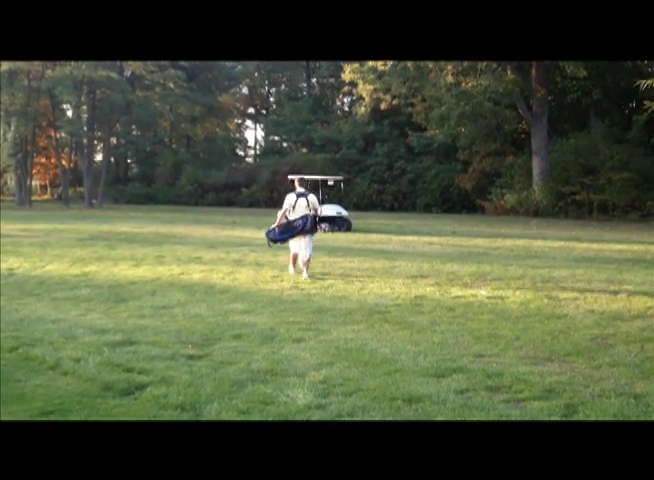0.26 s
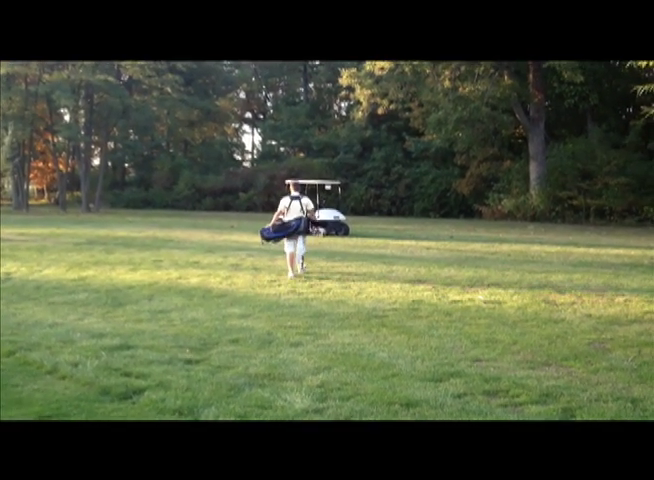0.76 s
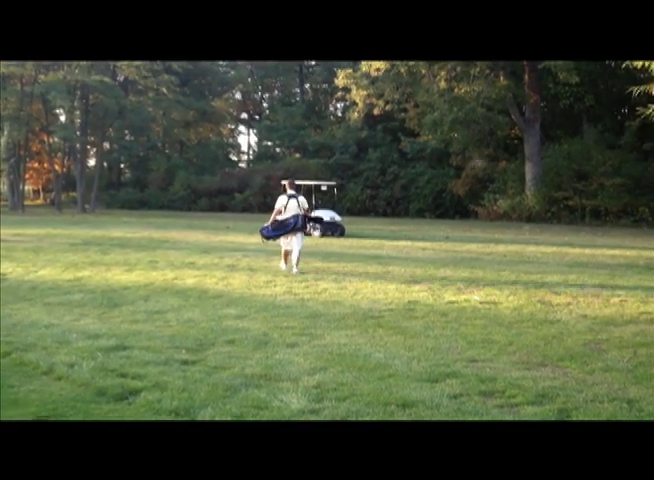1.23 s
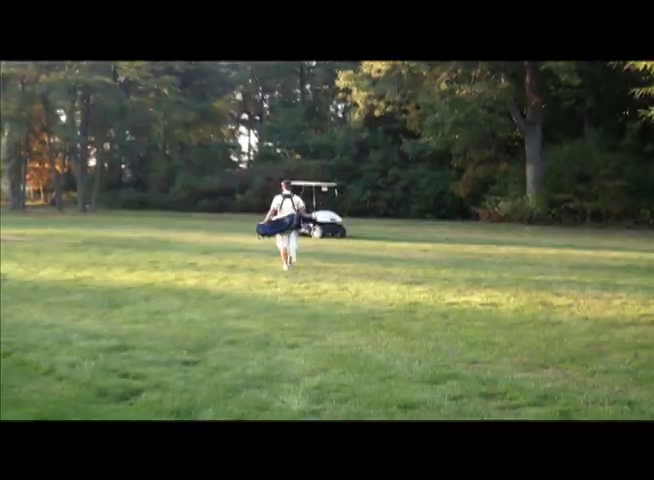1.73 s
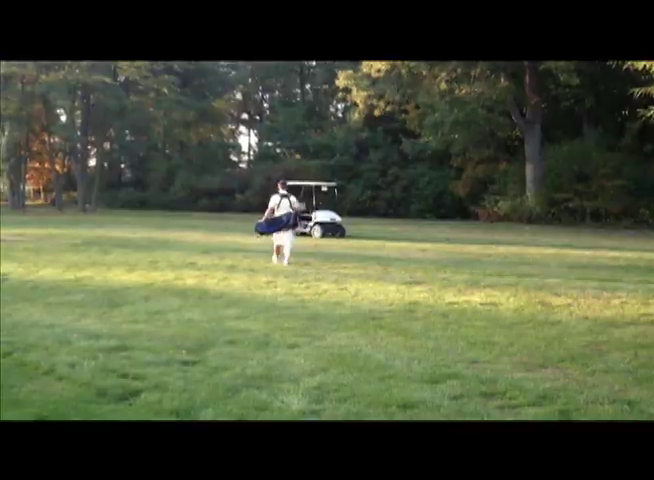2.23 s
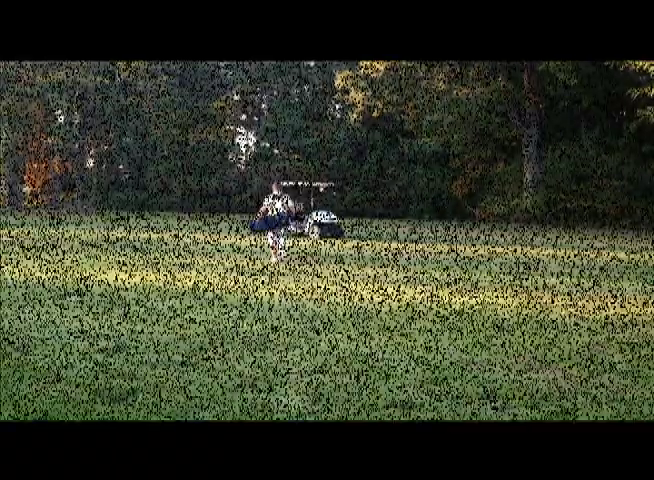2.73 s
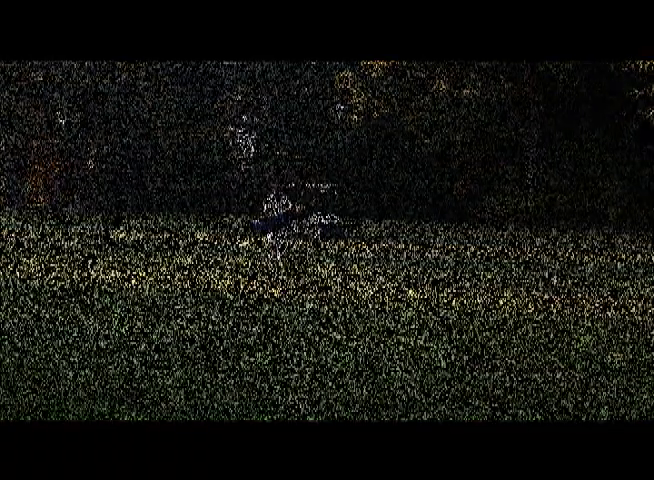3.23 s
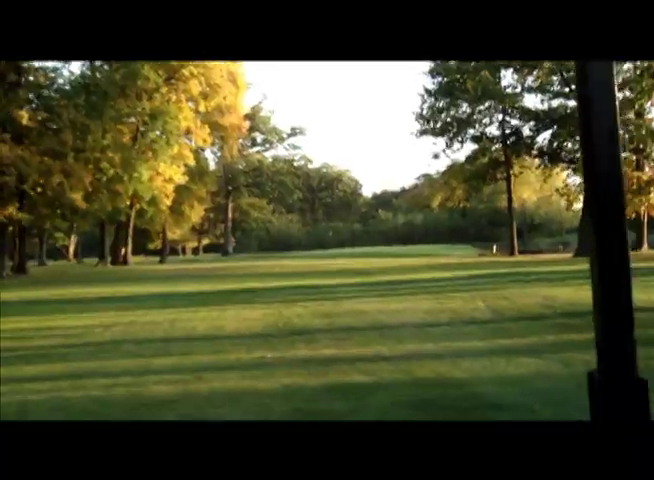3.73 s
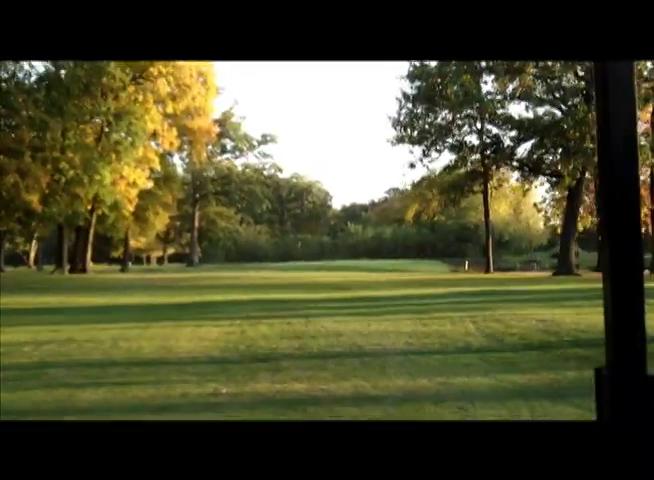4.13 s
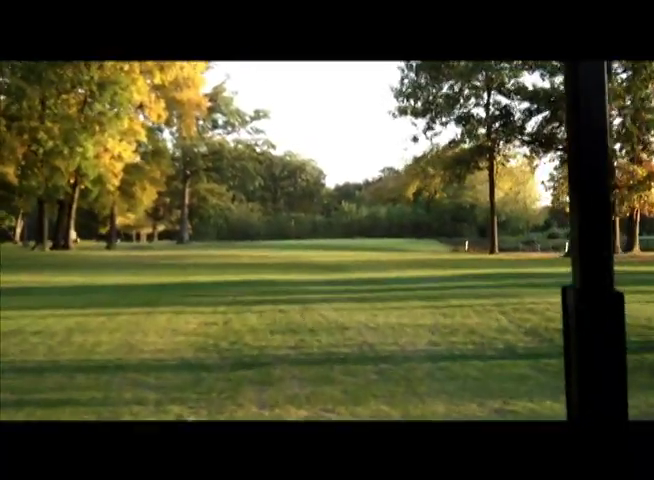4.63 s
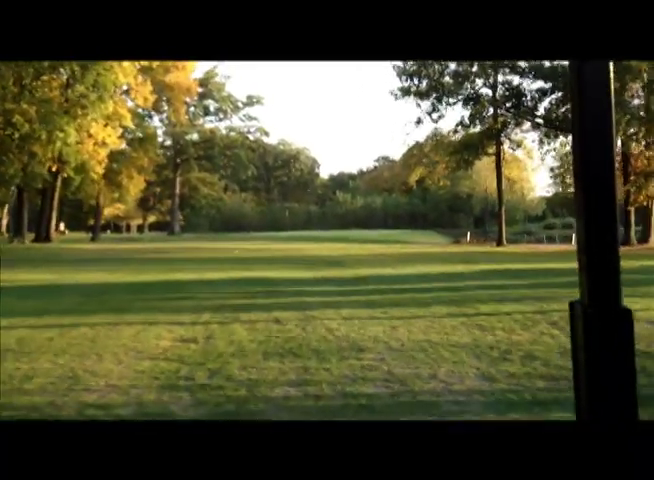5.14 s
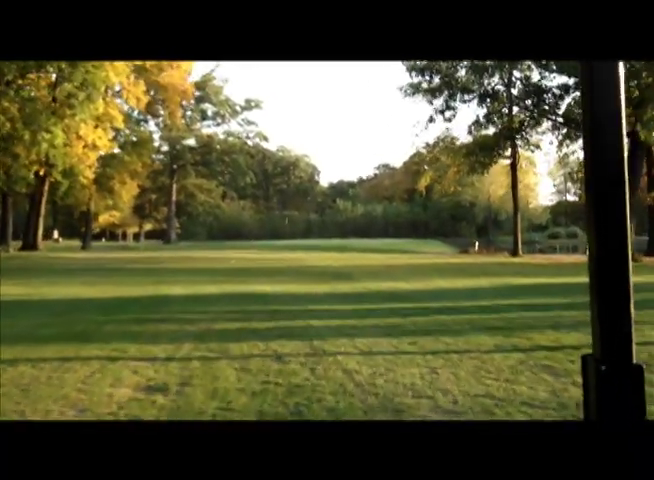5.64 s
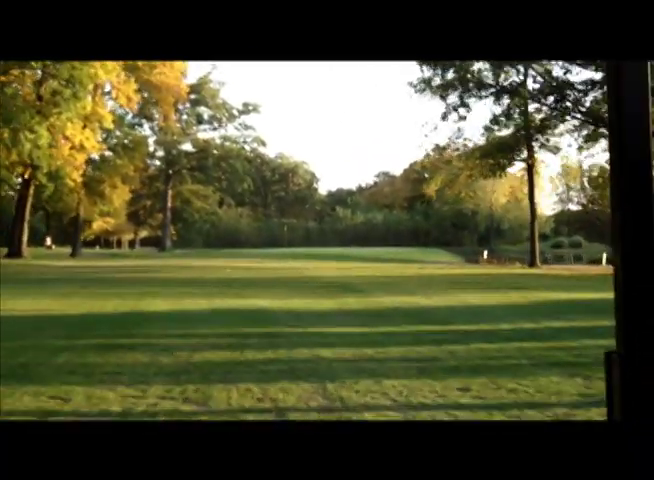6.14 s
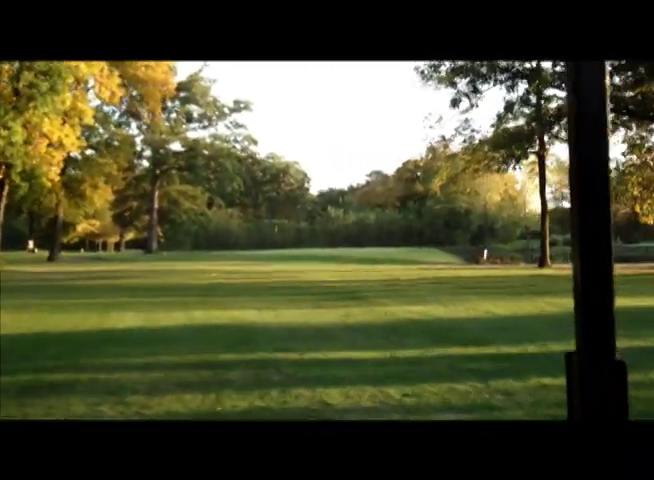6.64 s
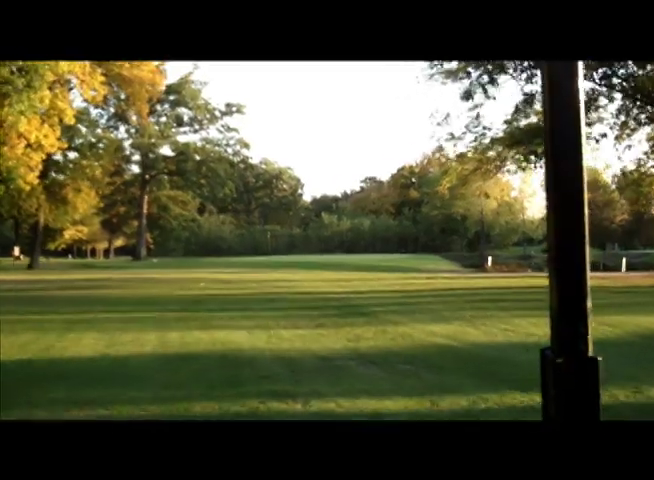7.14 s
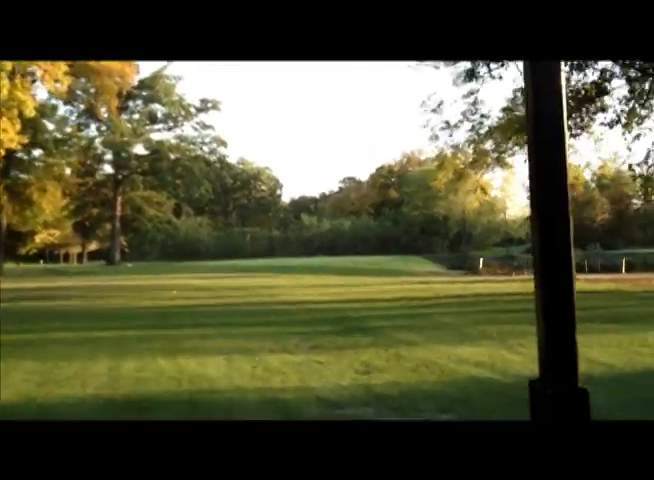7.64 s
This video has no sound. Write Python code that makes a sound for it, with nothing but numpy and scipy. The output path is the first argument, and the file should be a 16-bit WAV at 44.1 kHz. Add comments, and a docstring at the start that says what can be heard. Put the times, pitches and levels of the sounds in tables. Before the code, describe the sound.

Outdoors on a quiet lawn, a walker's golf bag clicks about twice a second, each step a tight cluster of short metallic ticks with a soft padded thump, and lighter touches between. Faint crickets, leaves and a distant hum lie behind. At three and a half seconds it cuts hard to an onboard cart ride: low rumble, irregular jolts, rattling panels, steel clinks and hollow post knocks, close to the microphone.

```python
"""On a lawn at dusk, a golfer walks with a bag: club heads click at each step and as the bag swings,
crickets trill and a far machine hums. Then comes a cart ride over bumpy grass.
The frame rumbles, jolts shake panels and bags, a loose steel part clinks and the roof post knocks.
Blows are short fading tones with noisy edges; rumble, rattle and leaves are shaped noise."""
import sys
import numpy as np
from scipy import signal
from scipy.fft import rfft, irfft, next_fast_len
from scipy.io import wavfile
from scipy.ndimage import map_coordinates

SR = 44100
rng = np.random.default_rng(int(sys.argv[2]) if len(sys.argv) > 2 else 0)


def to_wav(s):
    """Save 16-bit WAV."""
    ch = np.atleast_2d(s).T  # columns
    pcm = np.round(np.clip(ch, -1, 1) * 32767)  # PCM
    wavfile.write(sys.argv[1], SR, pcm.astype(np.int16))


N = 347508
T = np.arange(N) / SR  # the time of every sample, in seconds

RIDE_S = 3.536  # the walk gives way to the ride
TOP_HZ = 15800  # nothing above this is kept

# Below, "t60/s" is the time a tone takes to fall by 60 dB; levels are starting points for each blow.
# Lawn air, far traffic and leaves: f/Hz, relative level/dB
LAWN_SPECTRUM = [(15, -45), (25, -8), (114, 1.5), (427, -1), (720, 3), (988, 3.5), (1890, -9),
                 (2610, -11.5), (4490, -12), (7710, -23), (13200, -24.5), (16000, -24)]
# Hum of the far machine: t/s, level/dB
HUM_LEVELS = [(0, -60), (2, -59.5), (2.4, -72), (3.5, -68)]
# Soft low bumps: t/s, relative level/dB, f/Hz
THUD_EVENTS = [(1.506, -31, 177), (2.635, -26.5, 215), (2.759, -33, 133), (2.964, -34, 110)]

# Tone of a club head: f/Hz, relative level/dB, t60/s
HEAD_MODES = [(3350, 6, 0.0084)]
# Tones of the shafts in the bag: f/Hz, relative level/dB, t60/s
SHAFT_MODES = [(1113, 2, 0.055), (1595, 7, 0.031), (2130, -3, 0.0075), (2710, 12.5, 0.009),
               (4520, 12, 0.0084), (6160, 5, 0.014)]
# Steps, when the bag lands on the hip: t/s, level/dB, second contact after/s, last bounce after/s,
# head ring of the second contact against the step/dB
STEP_EVENTS = [(0.41, -30.5, 0.012, 0.029, 3), (0.9291, -32, 0.0079, 0.029, 1),
               (1.4321, -29.5, 0.0071, .0298, 1.5), (1.9494, -30.5, 0.014, 0.038, 8),
               (2.471, -29.5, 0.0067, 0.027, 8), (2.9476, -32, 0.013, 0.027, 1),
               (3.4687, -30, 0.0085, 0.036, 11.5)]
# Single touches as the bag swings: t/s, head ring level/dB, shaft knock level/dB
TOUCH_EVENTS = [(0.0686, -41, -51.5), (0.0914, -29, -53), (0.1113, -31, -39.5), (0.232, -53, -55),
                (0.3015, -30, -46), (0.595, -44, -57.5), (0.807, -55, -54), (0.861, -38, -49.5),
                (1.092, -26, -54), (1.1196, -42, -54), (1.3273, -30, -46), (1.6676, -36.5, -45),
                (1.787, -55, -55), (1.858, -24.5, -47), (2.107, -25, -55), (2.1388, -38, -50),
                (2.3558, -27, -44), (2.391, -40, -64), (2.404, -35, -57), (2.511, -35, -53),
                (2.6165, -29, -57), (2.6438, -32, -44.5), (2.866, -24, -47), (3.0816, -26.5, -49),
                (3.125, -27, -44.5), (3.3581, -26.5, -49.5), (3.3833, -33.5, -57)]
FIRST_DB, BOUNCE_DB = (6.5, -8), (-5, -22)  # (head ring, shaft knock) against the step
SECOND_SHAFT_DB = -13  # shaft knock of the second contact against the step
EDGE_DB = 6  # noisy edge against the shaft knock

# Strength of the ride: t/s, rumble level/dB, relative rattle level/dB
RIDE_LEVELS = [(3.54, -31.5, -40), (3.75, -33.5, -39), (3.9, -36, -43.5), (4.55, -36, -41), (5, -33, -36.5),
               (5.45, -30.5, -38.5), (5.65, -27.5, -30), (6.1, -30.5, -30.5), (6.8, -33, -34),
               (7.1, -29, -32.5), (7.5, -30.5, -37), (7.88, -28.5, -33.5)]
# Rumble of the frame: f/Hz, relative level/dB
RUMBLE_SPECTRUM = [(11, -56), (24, 2), (48, -2), (113, 0), (500, -12), (650, -16), (1100, -120)]
# Rattle of panels and loose bits: f/Hz, relative level/dB
RATTLE_SPECTRUM = [(180, -19), (300, -1.5), (647, 3), (964, -5.5), (1190, 4.5), (4550, -23), (9000, -45),
                   (13000, -120)]
# Jolts: t/s, relative level/dB, hold/s, treble against the frame/dB
JOLT_EVENTS = [(3.568, -34, 0.012, -2.5), (3.628, -45, 0.011, 7), (3.66, -41.5, 0.017, 0),
               (3.757, -36.5, 0.0058, -4), (3.942, -43, 0.025, -2.5), (4.034, -36, 0.0062, -5),
               (4.237, -30.5, 0.0094, -16), (4.335, -34.5, 0.027, -10), (4.389, -30.5, 0.019, -13),
               (4.435, -36, 0.015, -7), (4.909, -31, 0.014, -28), (4.965, -25.5, 0.0099, -9.5),
               (5.07, -32.5, 0.0036, -2.5), (5.18, -32, 0.0087, -3), (5.231, -42, 0.024, 7.5),
               (5.3, -29.5, 0.045, -12), (5.373, -30.5, 0.012, -11), (5.551, -31, 0.014, -2.5),
               (5.585, -22.5, 0.021, -28), (5.632, -24.5, 0.026, -8.5), (5.693, -30, 0.0097, -4),
               (5.733, -41, 0.0072, 2), (5.816, -21, 0.025, -8), (5.917, -24, 0.031, -9.5),
               (6.052, -26.5, 0.006, -14), (6.082, -34, 0.0042, 2), (6.153, -26.5, 0.013, -8),
               (6.24, -18.5, 0.011, -26), (6.308, -25, 0.03, -11), (6.428, -36.5, 0.024, -1.5),
               (6.519, -29, 0.049, -8), (6.594, -32, 0.0054, -21), (6.629, -29.5, 0.0082, -5.5),
               (6.669, -30, 0.011, -4), (6.819, -31, 0.0075, 2.5), (6.888, -29.5, 0.023, -1.5),
               (6.93, -24.5, 0.0046, -14), (6.986, -29, 0.018, -3.5), (7.109, -38, 0.022, 4.5),
               (7.169, -26, 0.0095, -6), (7.202, -24.5, 0.0059, -8), (7.292, -41.5, 0.018, 7),
               (7.403, -25.5, 0.02, -9.5), (7.561, -39.5, 0.017, 0), (7.619, -21.5, 0.0094, -7.5),
               (7.667, -24.5, 0.012, -6), (7.726, -24.5, 0.0088, -11.5), (7.782, -28.5, 0.0036, -8),
               (7.833, -40, 0.014, 7.5)]
# Resonance of the floor panel: f/Hz, width/Hz, relative level/dB
PANEL_PEAKS = [(638, 60, 0)]
# Resonances of the frame: f/Hz, width/Hz, relative level/dB
FRAME_PEAKS = [(1190, 25, 5), (1463.5, 43.5, 7.5), (1990, 560, -5.5)]
# Resonances of the bags: f/Hz, width/Hz, relative level/dB
BAG_PEAKS = [(3200, 4100, -16), (5500, 6000, -21.5)]
# Dry snaps of club on club: t/s, relative level/dB
SNAP_EVENTS = [(4.4346, -39), (4.484, -42), (5.0744, -28.5), (5.1303, -34), (5.1482, -32), (5.553, -34),
               (5.923, -34), (6.63, -34)]
JOLT_RISE_S, JOLT_T60_S = 0.00094, 0.083
PANEL_DB, PANEL_FADES_DB_PER_S = 3.5, 3  # the panel against the frame; it answers less as the ride goes on

# Hits of the loose steel part: t/s, relative level/dB
CLINK_EVENTS = [(3.816, -50.5), (4.295, -50), (4.548, -50), (5.5392, -45), (5.8213, -40), (5.9306, -39.5),
                (5.969, -47), (6.1772, -48.5), (6.3782, -37.5), (6.536, -43.5), (6.5889, -39.5),
                (6.724, -50.5), (6.817, -35.5), (6.907, -46), (6.967, -44), (7.0455, -41), (7.204, -35.5),
                (7.683, -38.5), (7.786, -37)]
# Tones of the steel part: f/Hz, relative level/dB, t60/s
STEEL_MODES = [(1190, 11, .1), (2414, 0, .06), (4580, -1, .07), (5005, -1, .06), (6778, -1, .04),
               (7490, -12, .035), (9255, -14, .04)]
# Taps on a club shaft: t/s, relative level/dB, favoured f/Hz
PING_EVENTS = [(3.763, -30, 2940), (4.522, -36, 2950), (4.697, -33.5, 3060), (6.129, -35, 2680),
               (6.999, -26, 2800), (7.458, -32.5, 3080), (7.608, -28, 2640)]
# Tones of one tapped shaft: f/Hz, relative level/dB, t60/s
ROD_MODES = [(2360, 4.5, 0.11), (2720, 2, 0.072), (3163, 1.5, 0.069), (3660, -3, 0.034)]
CHATTER_COUNT, CHATTER_DB = 18, -25  # extra steel hits; the weakest against the rattle level
TAP_COUNT, TAP_DB = 70, -6.5  # small shaft taps; the strongest against the rattle level
FAVOUR_DB_PER_OCTAVE = 39  # where the shaft is tapped favours one tone over its neighbours

# Knocks on the roof post: t/s, relative level/dB, f/Hz, t60/s
KNOCK_EVENTS = [(3.728, -1, 515, 0.016), (3.7358, -7, 546, 0.026), (4.0084, -1.5, 542, 0.0098),
                (4.459, -12.5, 523, 0.013), (6.5909, -12, 900, 0.006)]
# One rub of a joint: t/s, length/s, f/Hz, fall/Hz, level/dB
SQUEAK_EVENT = (3.624, .009, 2250, 300, -36)


def amp(db):
    """Turn dB into a gain."""
    return 10 ** (np.asarray(db) / 20)


def unit(x):
    """Scale to an average strength (rms) of 1."""
    return x / np.sqrt(np.mean(x ** 2) + 1e-20)


def curves(rows):
    """Draw straight lines between table rows: one curve for each column after the time."""
    s, *columns = np.transpose(rows)
    return [np.interp(T, s, column) for column in columns]


def wobble(rate):
    """A smooth random curve with rate knots a second."""
    knots = rng.standard_normal(int(N * rate / SR) + 4)
    return map_coordinates(knots, [T * rate])


def noise():
    """White noise: all pitches equally strong."""
    return rng.standard_normal(N)


def filtered(x, response):
    """Change the strength and phase of each pitch by a response of frequency."""
    m = next_fast_len(N + SR // 8, True)
    spectrum = rfft(x, m) * response(np.fft.rfftfreq(m, 1 / SR))
    return irfft(spectrum, m)[..., :N]


def coloured(points, x):
    """Shape x by (Hz, dB) points on a log pitch scale, rms 1."""
    f, db = np.transpose(points)

    def response(hz):
        return amp(np.interp(np.log(hz + 1), np.log(f + 1), db))

    return unit(filtered(x, response))


def resonant(peaks, x, order=1):
    """Pass x through resonances, order times; each pass would bring white noise to rms 1."""
    def response(f):
        total = 0
        for k, (centre, width, db) in enumerate(peaks):
            peak = 1j * f * width / (centre * centre - f * f + 1j * f * width)
            total = total + (-1) ** k * amp(db) * peak  # alternate signs
        return total

    gain = np.sqrt(np.mean(np.abs(response(np.linspace(0, SR / 2, 4096))) ** 2))
    return filtered(x, lambda f: (response(f) / gain) ** order)


def add(track, s, sound):
    """Mix a sound into a track at time s."""
    part = track[round(s * SR):][:len(sound)]
    part += sound[:len(part)]


def ring(modes, scatter_db, detune, attack):
    """One blow: fading tones of slightly random strength and pitch; a soft contact starts slowly."""
    t = T[:SR // 12]
    tones = 0
    for hz, db, t60 in modes:
        fade = amp(db + rng.normal(0, scatter_db) - 60 * t / t60)
        pitch = hz * (1 + rng.normal(0, detune))
        tones = tones + fade * np.sin(2 * np.pi * pitch * t)
    return (1 - np.exp(-t / attack)) * tones


def puff(t60):
    """The noisy edge of a blow: noise that fades by 60 dB in t60 seconds."""
    return rng.standard_normal(SR // 12) * amp(-60 * T[:SR // 12] / t60)


def grit(spiky_db):
    """Noise of tiny contacts of uneven size, rms 1."""
    return unit(noise() * amp(spiky_db * wobble(900)))


def bumps(rate, fade_s):
    """Strength of random small shocks: each starts at once and fades, over a steady floor, rms 1."""
    shocks = (rng.random(N) < rate / SR) * rng.lognormal(0, .3, N)
    fading = signal.lfilter([1], [1, -np.exp(-1 / (fade_s * SR))], shocks)
    return unit(fading + 0.4)


def clacks(count, hz, width_hz):
    """About count dry ticks a second, each a puff of noise in one broad resonance, rms 1."""
    hits = (rng.random(N) < count / SR) * amp(rng.uniform(-12, 0, N))
    fading = signal.lfilter([1], [1, -np.exp(-1 / (.0012 * SR))], hits)
    return unit(resonant([(hz, width_hz, 0)], fading * noise(), order=2))


def clatter(level, count, hz, spread, cycles):
    """About count small rings a second of the ride, up to spread octaves from hz, following level."""
    ride = N / SR - RIDE_S
    u, v, w = rng.random((int(count * ride), 3)).T
    at = ((RIDE_S + u * ride) * SR).astype(int)
    t = T[:SR // 60]
    pitches = hz * 2 ** (spread * (2 * v - 1))
    phase = pitches[:, None] * t  # counted in cycles
    strength = (level[at] * amp(-18 * w))[:, None]
    envelope = amp(-60 * phase / cycles) * (1 - np.exp(-phase))
    rings = strength * envelope * np.sin(2 * np.pi * phase)
    places = at[:, None] + np.arange(len(t))
    return np.bincount(places.ravel(), rings.ravel(), N + SR)[:N]


def trill(hz, fall_hz, rate, first_s, jitter):
    """A cricket: rate pulses a second, each sliding down in pitch."""
    turn = (rate * (T - first_s) + jitter * wobble(6.5) + .5) % 1 - .5  # place within the pulse
    pulses = np.exp(-(turn / .3) ** 4) * amp(wobble(rate))
    return pulses * np.sin(2 * np.pi * np.cumsum(hz - fall_hz * turn) / SR)


def lawn():
    """Far traffic and leaves as noise, a wavering hum, crickets and a faint fast treble pulse."""
    air = amp(-53) * coloured(LAWN_SPECTRUM, noise())
    hum_level = amp(curves(HUM_LEVELS)[0] + 0.83 * wobble(10.4))
    hum = hum_level * np.sin(2 * np.pi * np.cumsum(118 + 2.0 * wobble(3.73)) / SR)
    # the first cricket grows 1 dB weaker each second
    first_cricket = amp(-57.5 - T + wobble(3)) * trill(2210, 350, 37.44, .006, .015)
    second_cricket = amp(-63.5) * trill(2660, 250, 38.6, .01, .1)
    chorus_spectrum = [(3500, -45), (4250, 5), (4700, 6), (5600, -35.0)]
    far_chorus = amp(-68.5) * coloured(chorus_spectrum, noise())
    beat = np.cos(np.pi * 29.97 * (T - .0068)) ** 12  # 29.97 pulses a second
    pulse = amp(-76) * beat * resonant([(13300, 1500, 0)], noise(), order=2)
    return air + hum + first_cricket + second_cricket + far_chorus + pulse


def thuds():
    """Each soft bump is a low tone that dies within a few cycles, with a brief tone above it."""
    out = np.zeros(N)
    for s, db, hz in THUD_EVENTS:
        modes = [(hz, -3, 4 / hz), (hz * 5, 4, .004)]
        add(out, s, amp(db) * ring(modes, 1.6, .01, 0.0003))
    return out


def squeak():
    """A joint rubs once: a brief tone whose pitch sags, with two overtones."""
    s, length, hz, fall_hz, db = SQUEAK_EVENT
    u = np.clip((T - s) / length, 0, 1)
    phase = 2 * np.pi * np.cumsum(hz - fall_hz * u) / SR
    tones = sum(amp(-9 * k) * np.sin((k + 1) * phase) for k in range(3))
    return amp(db) * np.sin(np.pi * u) * tones


def cart():
    """The frame rumbles as low noise; small shocks keep panels and loose bits rattling and clacking."""
    rumble_db, rattle_db = curves(RIDE_LEVELS)
    uneven = coloured(RUMBLE_SPECTRUM, noise()) * amp(1.75 * wobble(18))
    rumble = amp(rumble_db) * unit(uneven)
    shake = grit(0.64) * bumps(60, 0.015)
    rattle = coloured(RATTLE_SPECTRUM, shake)
    rattle += amp(-20.0) * unit(resonant(FRAME_PEAKS[:2], shake))
    rattle += amp(-13.0) * unit(resonant(PANEL_PEAKS, shake))
    loose_bits = clatter(amp(rattle_db + 4.5), count=260, hz=1714, spread=1.42, cycles=32)
    return rumble + amp(rattle_db - 1) * unit(rattle) + loose_bits


def knocks():
    """Hollow plastic blows on the post: a few low cycles, a dull noisy edge and a thin crack."""
    out, edge = np.zeros(N), np.zeros(N)
    for s, db, hz, t60 in KNOCK_EVENTS:
        modes = [(hz, 4, t60), (hz * 0.715, -3, .02), (hz * 1.145, -4, .012)]
        crack = amp(db - 54) * puff(0.0032)
        add(out, s, crack - amp(db) * ring(modes, 1.0, 0.0059, 0.0011))
        add(edge, s, amp(db - 21.5) * puff(0.0084))
    return out + resonant([(2250, 140, 0)], edge)


def clinks():
    """Steel rings at nearly the same pitches on each hit; tapped shafts give short rough notes."""
    steel, edge, notes = np.zeros(N), np.zeros(N), np.zeros(N)
    ride = N / SR - RIDE_S
    rattle_db = curves(RIDE_LEVELS)[1]
    chatter, taps = [], []  # extra hits and taps at random times
    for u, v in rng.random((CHATTER_COUNT, 2)):
        s = RIDE_S + u * ride
        chatter.append((s, rattle_db[int(s * SR)] + CHATTER_DB + 8 * v))
    for s, db in CLINK_EVENTS + chatter:
        add(steel, s, amp(db) * ring(STEEL_MODES, 1.84, 0.0011, 0.000072))
        add(edge, s, amp(db + 1.5) * puff(0.0085))
    for u, v, w in rng.random((TAP_COUNT, 3)):
        s = RIDE_S + u * ride
        favoured_hz = ROD_MODES[int(w * len(ROD_MODES))][0]
        taps.append((s, rattle_db[int(s * SR)] + TAP_DB - 9 * v, favoured_hz))
    for s, db, hz in PING_EVENTS + taps:
        modes = [(f, d - FAVOUR_DB_PER_OCTAVE * abs(np.log2(f / hz)), t60) for f, d, t60 in ROD_MODES]
        add(notes, s, amp(db) * ring(modes, 2.6, 0.0053, 0.0022))
        add(edge, s, amp(db - 20.5) * puff(0.047))
    rough = amp(2.5 * wobble(300))
    return resonant([(3500, 2000, 0)], edge, order=2) + (steel + notes) * rough


def jolts():
    """Each jolt is a burst of tiny contacts: sudden start, hold, quick fade; clubs also snap together."""
    frame, panel, bags, snaps = np.zeros(N), np.zeros(N), np.zeros(N), np.zeros(N)
    t = T[:SR // 8]
    for s, db, hold, treble_db in JOLT_EVENTS:
        fade = amp(db - 60 * np.maximum(t - hold, 0) / JOLT_T60_S)
        burst = (1 - np.exp(-t / JOLT_RISE_S)) * fade
        add(frame, s, burst)
        add(panel, s, burst * amp(PANEL_DB - PANEL_FADES_DB_PER_S * (s - RIDE_S)))
        add(bags, s, burst * amp(treble_db))
    for s, db in SNAP_EVENTS:
        add(snaps, s, amp(db) * puff(0.012))
    shaken = resonant(FRAME_PEAKS, frame * grit(5.2))
    shaken += resonant(PANEL_PEAKS, panel * grit(0.71))
    shaken += resonant(BAG_PEAKS, bags * grit(4))
    mix = amp(-2.5) * shaken + resonant([(4900, 4200, 0)], snaps, order=2)
    mix += amp(5) * clatter(frame, count=360, hz=1304, spread=1.23, cycles=25.4)
    mix += amp(7.5) * clatter(bags, count=320, hz=3460, spread=0.7, cycles=53)

    def padding(hz):  # padded contacts carry little treble
        return 1 / (1 + 1j * hz / 6000) ** 3 / (1 + 1j * hz / 5000 - (hz / 7000) ** 2)

    return filtered(mix, padding)


def clubs():
    """Each contact rings a head, the shafts and a broad noisy edge; faint ticks fill the gaps."""
    out, edge = np.zeros(N), np.zeros(N)
    contacts = []
    for s, db, gap, bounce, second_db in STEP_EVENTS:
        second = (second_db, SECOND_SHAFT_DB)
        for late, (head, shaft) in [(0, FIRST_DB), (gap, second), (bounce, BOUNCE_DB)]:
            contacts.append((s + late, db + head, db + shaft))
    for s, head_db, shaft_db in contacts + TOUCH_EVENTS:
        add(out, s, amp(head_db) * ring(HEAD_MODES, 1.0, 0.02, 0.0007))
        add(out, s, amp(shaft_db) * ring(SHAFT_MODES, 3, 0.07, 0.0002))
        add(edge, s, amp(shaft_db + EDGE_DB) * puff(0.013))
    for s, db, *_ in STEP_EVENTS:  # the padded bag thumps the hip just after
        add(out, s + 0.00674, amp(db) * ring([(324, -4.0, 0.036)], 1.8, 0.12, 0.0032))
    out += resonant([(2170, 2120, 0)], edge, order=2)
    out += amp(-67.0) * clacks(count=30, hz=3280, width_hz=2400)
    tail = puff(0.068)  # the bag and the ground scatter the click
    scattered = signal.fftconvolve(out, tail / np.linalg.norm(tail))[:N]
    return out + amp(-10) * scattered


def scene():
    """The walk, then the ride with a steady preamplifier hiss."""
    riding = np.clip((T - RIDE_S) / .001, 0, 1)
    walk = lawn() + thuds() + clubs()
    hiss = amp(-71.5) * noise()
    ride = hiss + squeak() + cart() + knocks() + clinks() + jolts()
    return (walk * (1 - riding) + riding * ride)[None]


def record(dry):
    """The housing weakens a narrow band; the input cuts deep bass, saturates and is band-limited."""
    def colour(hz):
        notch = 1 - .75 * np.exp(-((hz - 7700) / 140) ** 2)
        bass_cut = (1j * hz / (25 + 1j * hz)) ** 2
        return notch * bass_cut

    heard = filtered(dry, colour)
    saturated = heard / (1 + np.abs(heard / .52) ** 8) ** (1 / 8)  # peaks stay below 0.52
    return filtered(saturated, lambda hz: hz < TOP_HZ)


dry = scene()
out = record(dry)
to_wav(out)
```